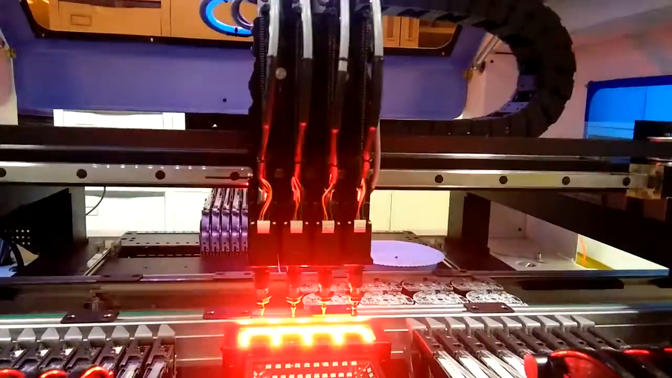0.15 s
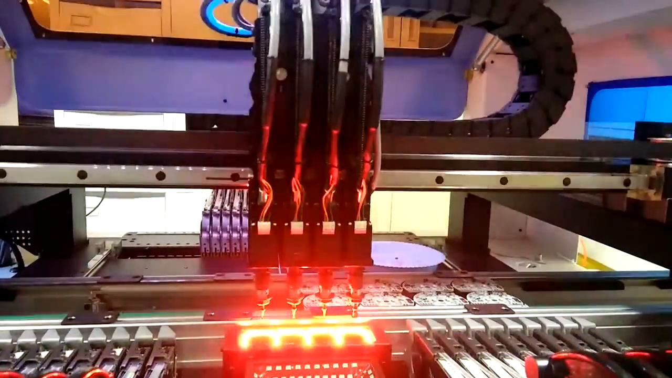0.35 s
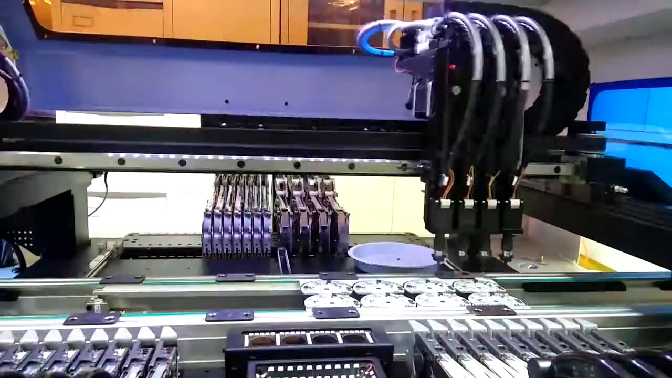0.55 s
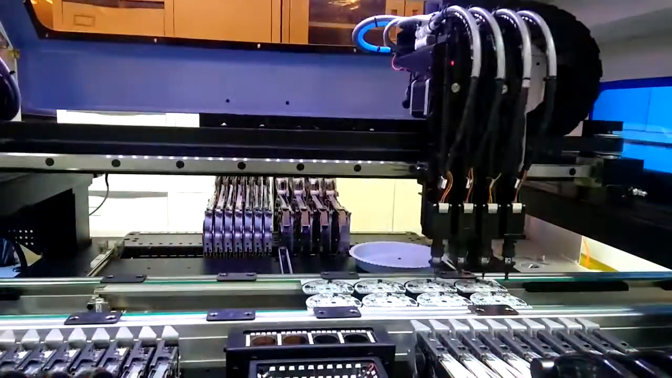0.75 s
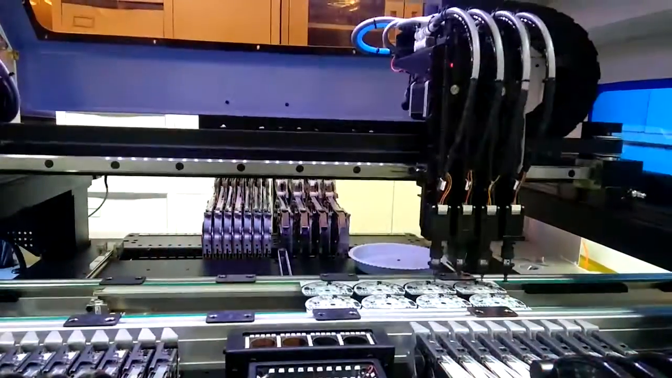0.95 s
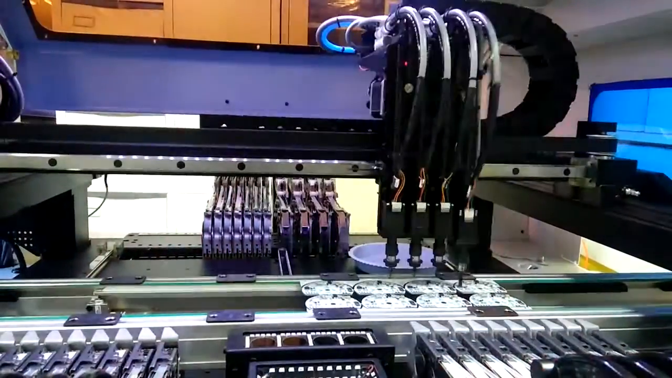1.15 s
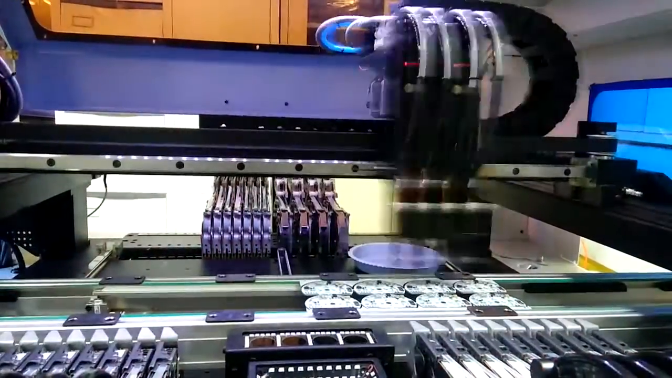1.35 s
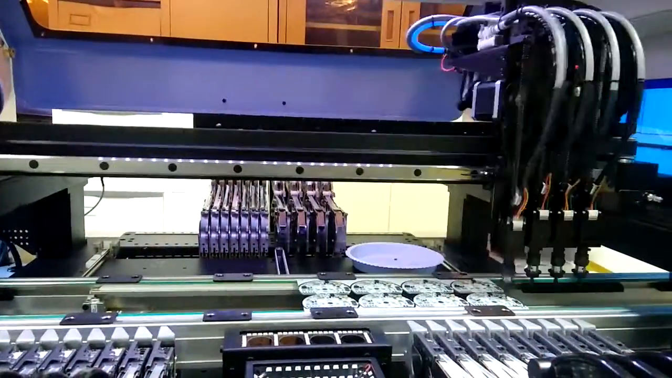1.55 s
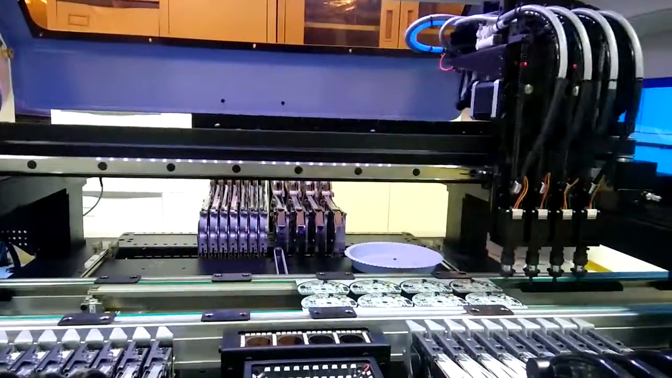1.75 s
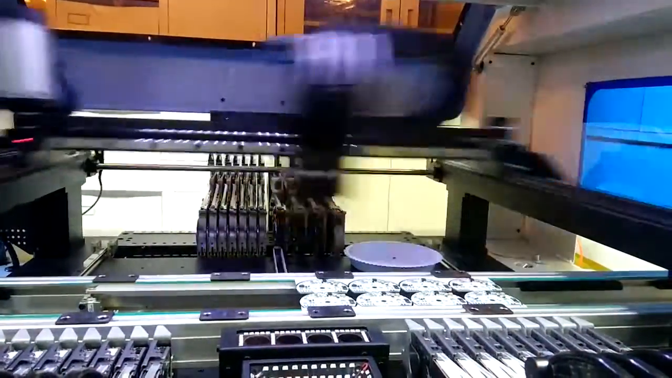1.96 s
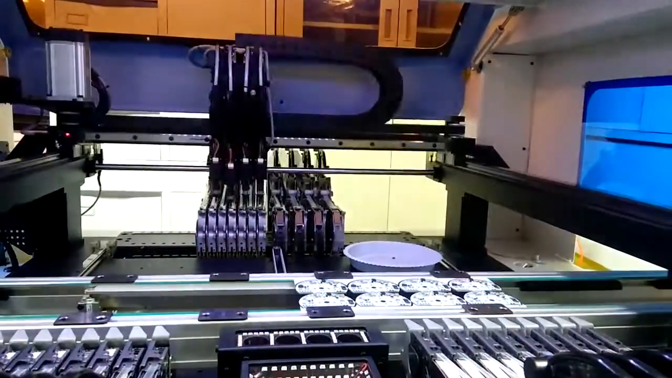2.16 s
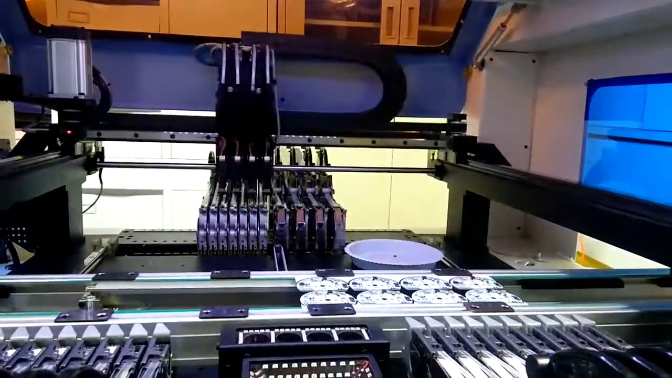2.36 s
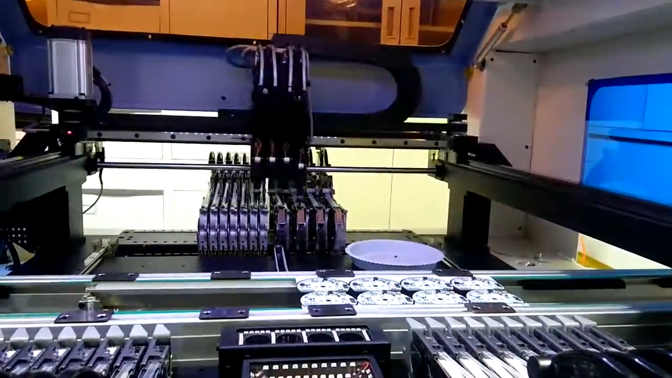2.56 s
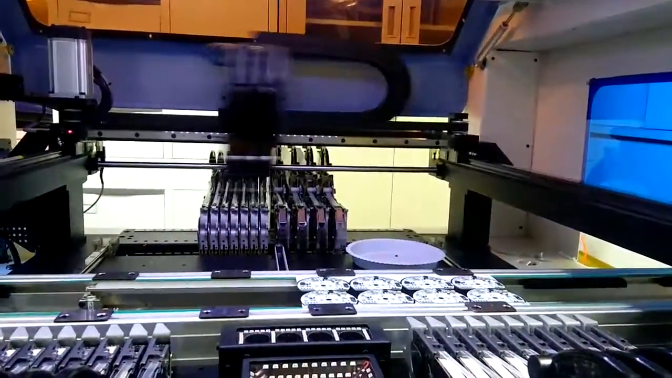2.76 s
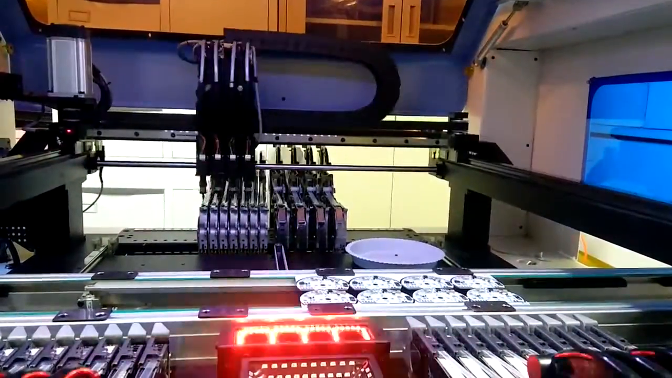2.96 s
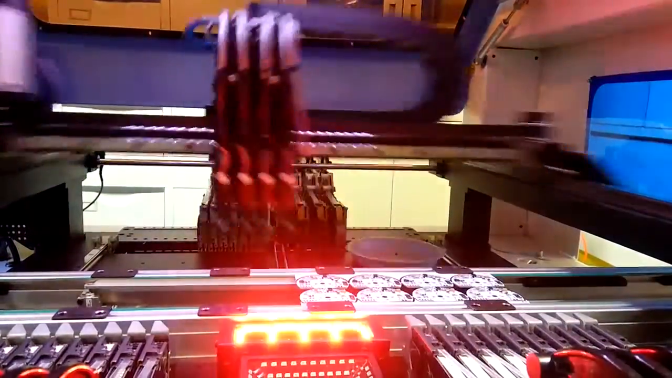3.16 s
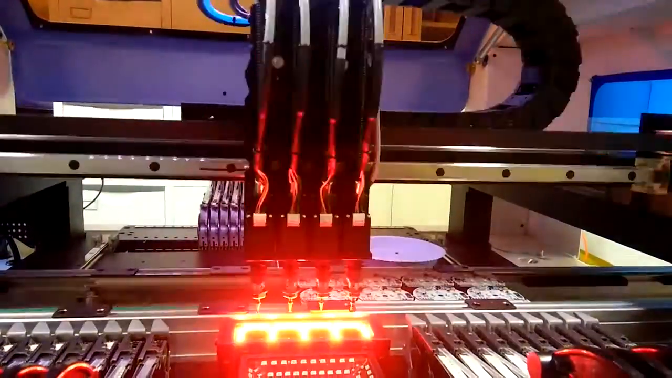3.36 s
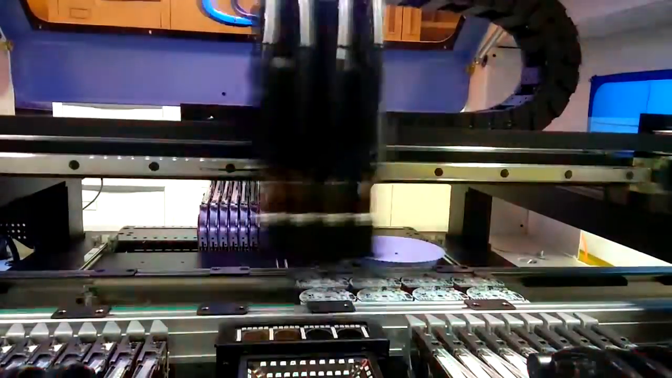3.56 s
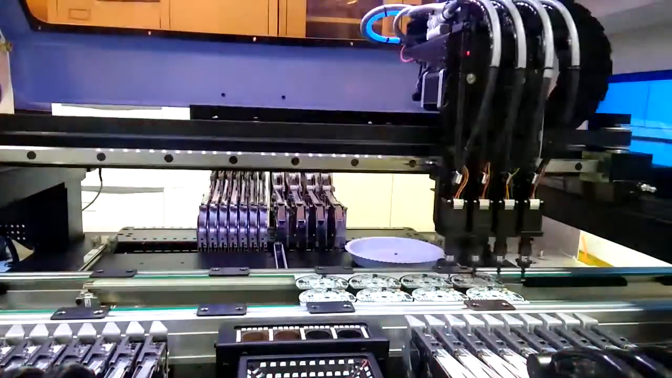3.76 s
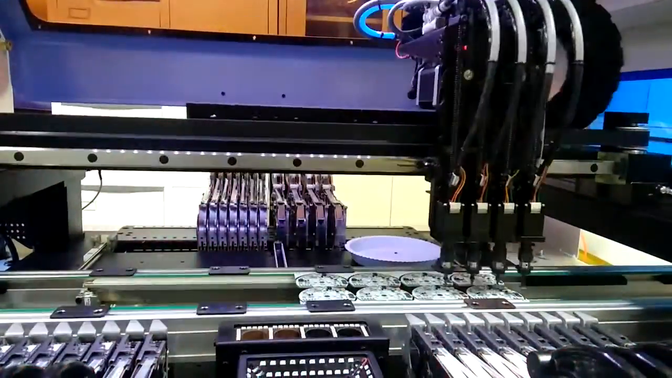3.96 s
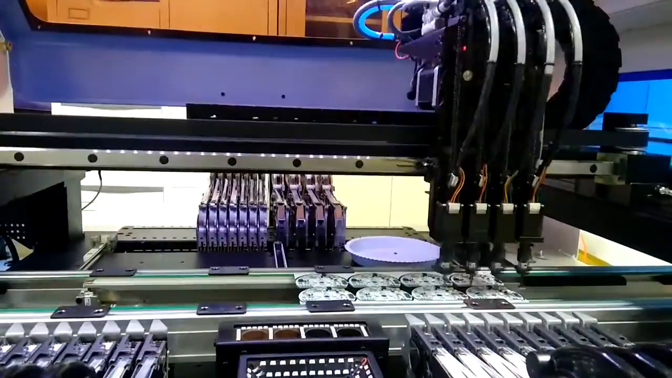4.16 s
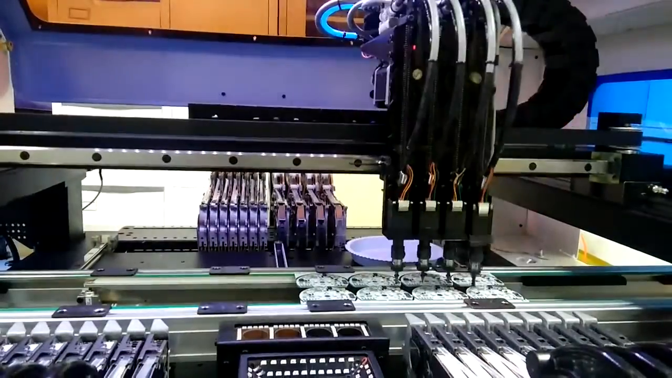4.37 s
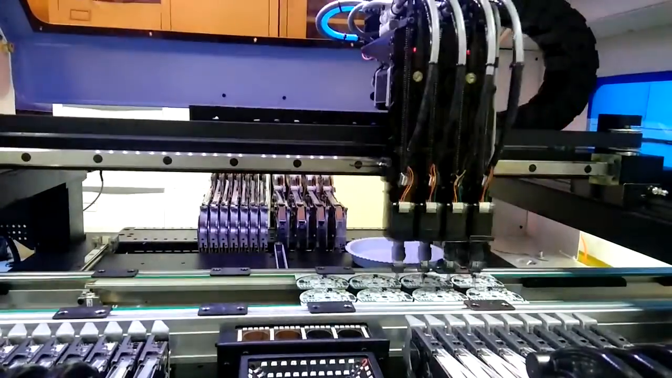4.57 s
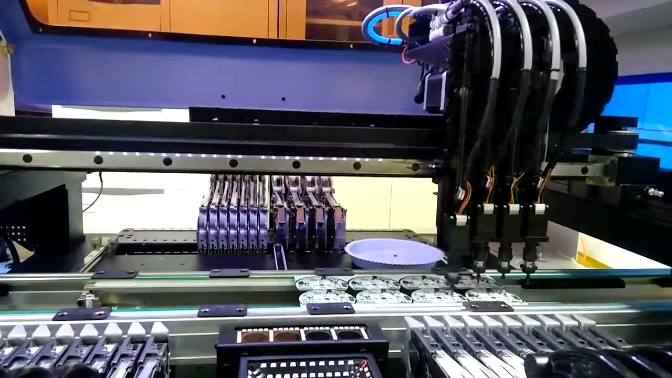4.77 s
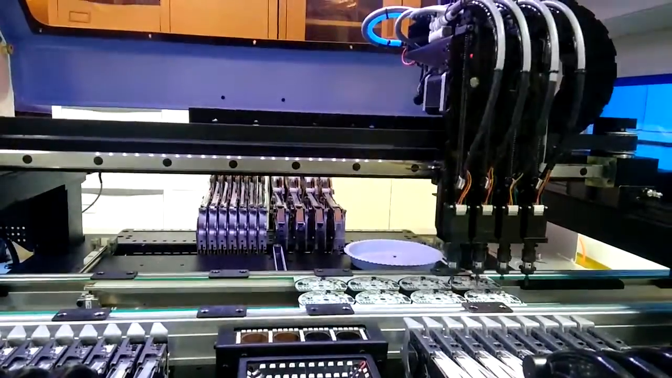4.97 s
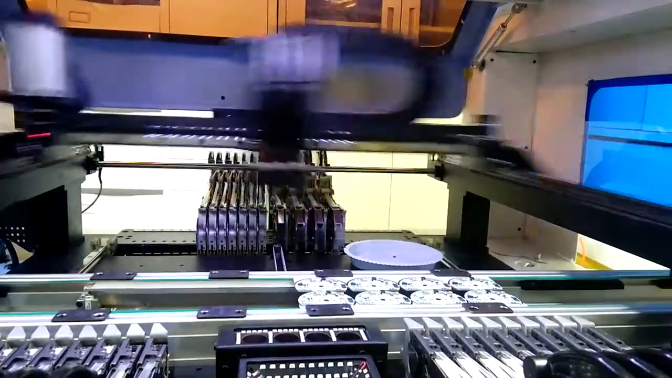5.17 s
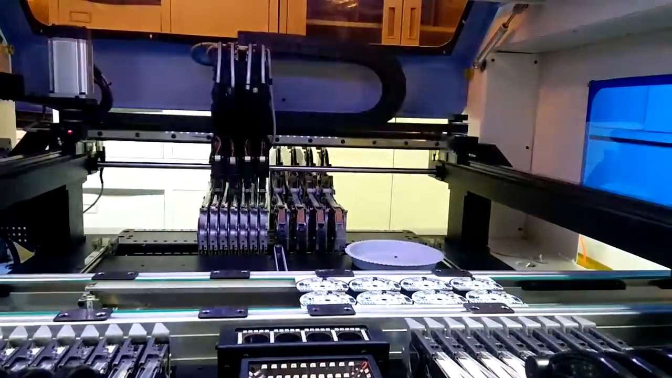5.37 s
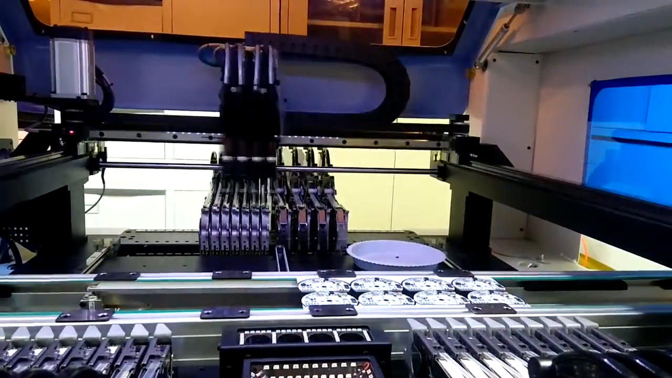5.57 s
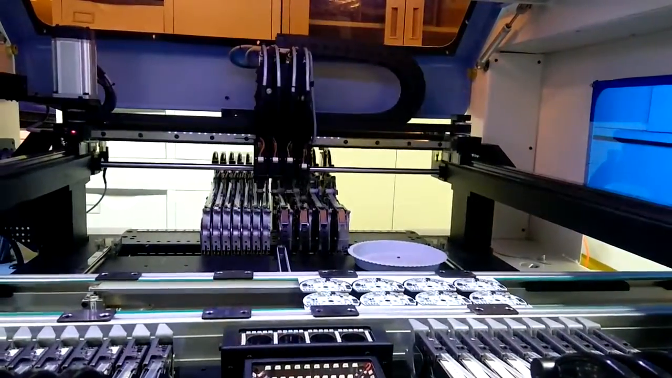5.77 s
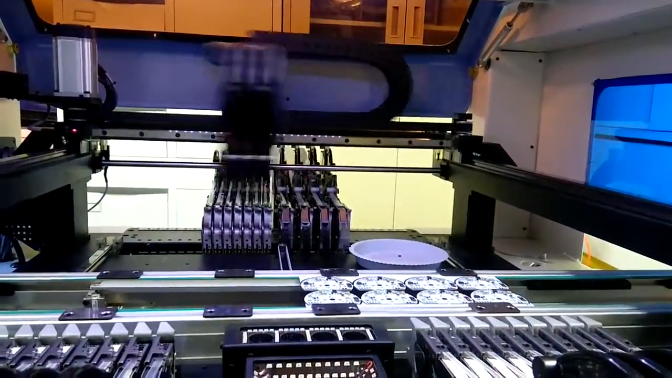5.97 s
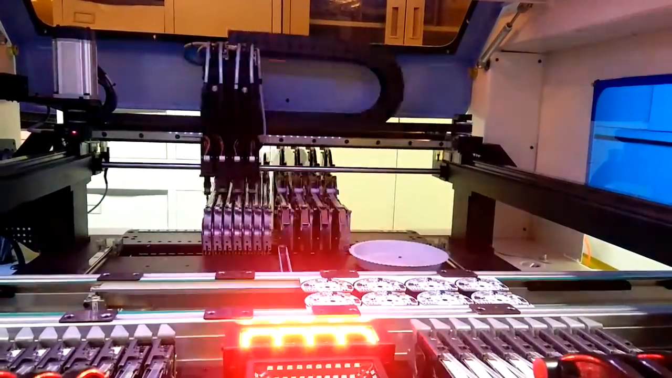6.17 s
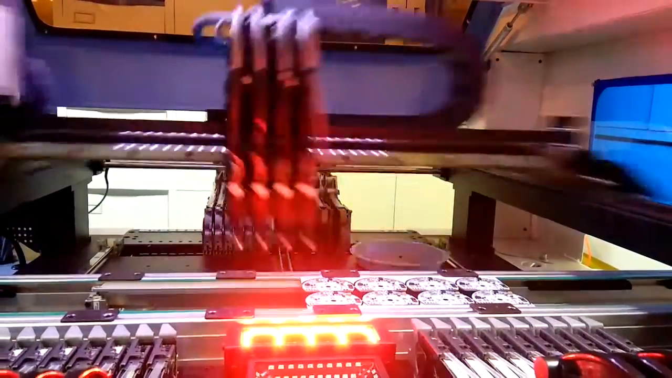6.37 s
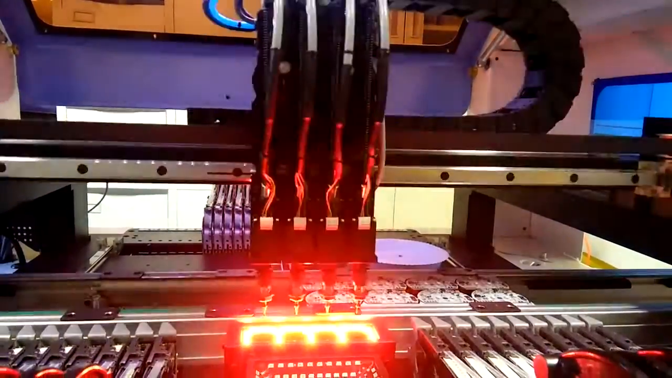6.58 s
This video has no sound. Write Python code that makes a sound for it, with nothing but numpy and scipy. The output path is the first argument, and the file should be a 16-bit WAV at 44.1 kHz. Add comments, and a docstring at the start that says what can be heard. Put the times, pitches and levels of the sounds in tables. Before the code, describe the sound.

Close inside a machine cabinet, a gantry rushes out with a gritty rolling roar and a buzzy belt whine, thumping as it brakes. Short servo hops and four spitting air puffs follow while vacuum hiss thins out. It rushes back, feeders clack and hiss builds up again, then the whole cycle repeats and a third outward run begins. Low workshop hum lies beneath.

```python
"""The roar of rails, the whine of a belt and the hiss of air come first: a gantry dashes out to its board.
A pick-and-place machine, close by in its cabinet, works through two cycles and sets out on a third run.
Rails and bearings are noise filtered by modes and following speed; belt, frame and servo are driven tones.
Vacuum nozzles hiss as turbulent noise while they hold parts, and let each go with a puff of air.
Feeders clack as scatters of reflections with a ringing part, and landing nozzles boom in the base."""
import sys
import numpy as np
from scipy import signal
from scipy.fft import rfft, irfft, next_fast_len
from scipy.io import wavfile

SR = 44100
rng = np.random.default_rng(int(sys.argv[2]) if len(sys.argv) > 2 else 0)


def to_wav(s):
    """Save 16-bit WAV."""
    ch = np.atleast_2d(s).T  # columns
    pcm = np.round(np.clip(ch, -1, 1) * 32767)  # PCM
    wavfile.write(sys.argv[1], SR, pcm.astype(np.int16))


N = 291501
SIZE = next_fast_len(N, True)
TIME, BINS = np.arange(N) / SR, np.fft.rfftfreq(SIZE, 1 / SR)


def amp(db):
    """Level law: decibels to amplitude gain."""
    return 10 ** (np.asarray(db) / 20)


def unit(x):
    """Normalisation: scales to an rms of 1."""
    return x / np.sqrt(np.mean(x ** 2) + 1e-20)


def colour(points):
    """Spectral envelope: joins (Hz, dB) points on a log axis into a gain for each bin."""
    hz, db = np.transpose(points)
    return amp(np.interp(np.log(BINS + 1), np.log(hz), db))


def peak(hz, width_hz):
    """Simple resonance: gain 1 at its centre, half power at the edges of its width."""
    return 1 / (1 + 2j * (BINS - hz) / width_hz)


def lifted(modes):
    """Modal superposition: a body's modes stand out of a flat background."""
    return 1 + sum((amp(db) - 1) * peak(hz, width) for hz, width, db in modes)


def shaped(x, response):
    """Linear filtering by a frequency response, then an rms of 1."""
    return unit(irfft(rfft(x, SIZE) * response, SIZE)[..., :N])


def noise():
    """Broadband excitation: white noise, as mid and side."""
    return rng.standard_normal((2, N))


def wander(rate_hz):
    """Slow random modulation: low-passed noise of rms 1."""
    return shaped(rng.standard_normal(N), np.exp(-(BINS / rate_hz) ** 2))


def add(mix, s, sound):
    """Superposition: mixes a sound in at time s, or at 0 if s is earlier."""
    part = mix[..., max(round(s * SR), 0):][..., :sound.shape[-1]]
    part += sound[..., :part.shape[-1]]


def rattle(per_s, share):
    """Contact noise: small impacts of uneven size hold this share of the power, rubbing the rest."""
    impacts = unit(noise() * (rng.random(N) < per_s / SR))
    return np.sqrt(share) * impacts + np.sqrt(1 - share) * noise()


def arch(s, length):
    """Raised-cosine envelope: a smooth rise and fall around the time s."""
    out = np.zeros(N)
    t = np.arange(max(s - length / 2, 0), s + length / 2, 1 / SR)
    add(out, s - length / 2, np.cos(np.pi * (t - s) / length) ** 2)
    return out


def ringing(blows, rise, t60):
    """Energy addition of decays: level of a body struck by (s, dB) blows, each followed for 1 s."""
    power, t = np.zeros(N), TIME[:SR]
    shape = (np.minimum(t / rise, 1) * amp(-60 * np.maximum(t - rise, 0) / t60)) ** 2
    for s, db in blows:
        add(power, s, amp(db) ** 2 * shape)
    return np.sqrt(power)


def lingering(gain, db, t60):
    """Reverberant storage: exponentially leaking power sets the level of a sound's tail."""
    keep = amp(-60 / (t60 * SR)) ** 2
    return amp(db) * np.sqrt(signal.lfilter([1 - keep], [1, -keep], gain ** 2))


def swell(s, hz, length, db, glide=0, grit_hz=55):
    """Narrow-band resonance, roughly driven, swelling around the time s: returns its start and sound."""
    t = np.arange(-length / 2, length / 2, 1 / SR)
    grit = signal.lfilter(*signal.butter(1, grit_hz, fs=SR), rng.standard_normal((2, SR // 2)))
    real, imaginary = unit(signal.lfilter(*signal.butter(2, 3 * grit_hz, fs=SR), grit))[:, -len(t):]
    rough = 1 + .34 * (real + 1j * imaginary)
    cycles = hz * t + glide * t ** 2 / 2 + rng.random()
    tone = unit((rough * np.exp(2j * np.pi * cycles)).real)
    return s - length / 2, amp(db) * tone * np.cos(np.pi * t / length) ** 2


# centre of the suction's broad resonance, which drifts over time: (time [s], centre [Hz])
SUCTION_PEAK = [(0, 5250), (.45, 4770), (.7, 4900), (1.0, 4920), (1.3, 5940), (1.65, 4540), (2.35, 4600),
                (2.5, 5500), (2.8, 5400), (3.15, 5360), (3.65, 4660), (4.15, 5670), (4.55, 4380),
                (5.5, 4860), (5.8, 5520), (6.1, 5430), (6.35, 5110)]


def patchy(x, depth_db, patch_hz, patch_s, peak_db=0, peak_hz=600):
    """Drifting patches: random regions of time and frequency lift and sink; peak_db lifts the suction's peak."""
    hz, t, z = signal.stft(x, SR, nperseg=1024, noverlap=768)
    across = np.fft.fftfreq(len(hz), hz[1])[:, None] * patch_hz
    along = np.fft.rfftfreq(len(t), t[1]) * patch_s
    blur = np.exp(-across ** 2 - along ** 2)
    chance = rng.standard_normal(z.shape[1:])
    patches = unit(np.fft.irfft2(np.fft.rfft2(chance) * blur, z.shape[1:]))
    centre = np.interp(t, *np.transpose(SUCTION_PEAK))
    hump = np.exp(-((hz[:, None] - centre) / peak_hz) ** 2)
    z = z * amp(depth_db * patches + peak_db * hump)
    return unit(signal.istft(z, SR, nperseg=1024, noverlap=768)[1][:, :N])


# long runs out to the board and back to the feeders; levels before the trims in the sources:
# (start [s], rolling [dB], sizzle of the bearings [dB], jolt of starting [dB], jolt of braking [dB])
OUT_RUNS = [(0.0, -29, -30.5, -29, -30.5), (3.183, -27.5, -32.5, -31.5, -29),
            (6.346, -28.5, -29, -29.5, -29)]
BACK_RUNS = [(1.991, -27.5, -46, -30.5, -33), (5.141, -27, -36.5, -31.5, -31)]
# course of a long run:
# (time to the fastest moment [s], length of rolling [s], length of sizzle [s], time to the brake's bite [s])
OUT_COURSE = (.18, 0.38, 0.43, .235)
BACK_COURSE = (0.15, 0.31, .28, 0.22)


def long_runs():
    """Repeated kinematics: every long run joined to the course of its direction."""
    return [(*run, *OUT_COURSE) for run in OUT_RUNS] + [(*run, *BACK_COURSE) for run in BACK_RUNS]


# noise spectrum of rolling: (frequency [Hz], relative density [dB])
ROLL_COLOUR = [(30, -37), (150, -15), (280, 6), (420, 5), (560, 2), (680, 2), (950, 0.5), (1500, -1),
               (2000, -3), (2900, -4), (3600, -10), (6000, -9), (8000, -16.5), (14000, -20)]
# modes of the gantry: (frequency [Hz], width [Hz], lift [dB])
GANTRY_MODES = [(388, 40, -4), (464, 71, 11), (743, 32, 5), (920, 17, 3.5), (976, 10, 5), (1236, 19, 4.5),
                (1340, 13, 9), (1664, 29, 2), (2244, 28, 7.5), (2760, 130, 5.5)]
# the head creeps into a run and out of it (dB below full speed's level, added length)
CREEP_DB, CREEP_S = -27.5, 0.028
HOP_ROLL_DB = -3  # rolling under a hop, relative to its rattle
CLACK_ROLL_DB, CLACK_ROLL_T60 = -17.5, 0.35  # gantry's rattle relative to a clack, decay in s
# the cabinet holds on to the rolling, less so to its treble (level, decay in s, corner)
LINGER_DB, LINGER_T60, LINGER_HZ = -11, 0.67, 2170


def rolling():
    """Rolling noise: bearings and cable chain excite the gantry's modes as speed rises; the cabinet lingers."""
    body = colour(ROLL_COLOUR) * lifted(GANTRY_MODES)
    roll = shaped(rattle(per_s=1100, share=0.32) * amp(0.29 * wander(60)), body)
    roll = patchy(roll, 3.9, patch_hz=110, patch_s=.07)
    echo = shaped(noise(), body / (1 + (BINS / LINGER_HZ) ** 4))
    level = np.zeros(N)
    for start, roll_db, _, _, _, fastest, length, *_ in long_runs():
        s = start + fastest
        level += amp(roll_db) * (arch(s, length) + amp(CREEP_DB) * arch(s, length + CREEP_S))
    level += sum(amp(db + HOP_ROLL_DB) * arch(s, length) for s, length, db, *_ in HOPS)
    echo_level = lingering(level, LINGER_DB, LINGER_T60)
    # every clack also rattles the gantry
    blows = [(s, db + CLACK_ROLL_DB) for s, db, *_ in all_clacks()]
    knocked = ringing(blows, rise=0.0033, t60=CLACK_ROLL_T60)
    mid_side_trim = amp([[3.8], [-4]])
    return mid_side_trim * (roll * np.hypot(level, knocked) + echo * echo_level)


# noise spectrum of the bearings' sizzle: (frequency [Hz], relative density [dB])
SIZZLE_COLOUR = [(2500, -26.5), (4500, -9.5), (6000, -3.5), (7500, -9), (9000, 3.5), (10000, 2.5),
                 (11200, -0.5), (14300, -5.5)]
SIZZLE_POWER = 1.64  # how steeply sizzle grows: power of the speed's arch


def sizzling():
    """Micro-impact noise: bearings sizzle in the treble, growing steeply with the head's speed."""
    sizzle = shaped(rattle(per_s=1500, share=0.24) * amp(1.5 * wander(90)), colour(SIZZLE_COLOUR))
    sizzle = patchy(sizzle, 3.1, patch_hz=180, patch_s=.05)
    level = np.zeros(N)
    for start, _, sizzle_db, _, _, fastest, _, length, _ in long_runs():
        level += amp(sizzle_db) * arch(start + fastest, length) ** SIZZLE_POWER
    return amp(1.5) * sizzle * level


# noise spectra of the shaken frame and of the heavy base: (frequency [Hz], relative density [dB])
SHAKE_COLOUR = [(25, -44.5), (60, -35), (105, -9.5), (135, 2.5), (190, -3), (250, 2), (330, -6), (480, -12),
                (800, -31)]
RUMBLE_COLOUR = [(20, -25), (35, -27.5), (48, -15.5), (58, -3), (75, 7.5), (102, -3), (132, 10.5),
                 (175, 3.5), (260, -24)]
JOLT_RISE_S, JOLT_T60 = 0.031, 0.76  # the frame's answer to any jolt (rise, decay in s)
# a hop jolts as it starts and brakes (shares of its length from the fastest moment)
HOP_START, HOP_BRAKE = -.28, 0.17
HOP_START_DB = -4  # a hop's starting jolt, relative to the braking one


def shaking(rumble_follows=0.66):
    """Inertial excitation: the gantry's starts and stops and landing nozzles shake the frame and base."""
    jolts = landings()
    for start, _, _, start_db, brake_db, *_, brake in long_runs():
        jolts += [(start + 0.012, start_db), (start + brake, brake_db)]
    for s, length, _, db, *_ in HOPS:
        jolts += [(s + HOP_START * length, db + HOP_START_DB), (s + HOP_BRAKE * length, db)]
    level = ringing(jolts, JOLT_RISE_S, JOLT_T60)
    shake = shaped(noise(), colour(SHAKE_COLOUR)) * level
    # the heavy base answers less sharply than the frame
    rumble = shaped(noise(), colour(RUMBLE_COLOUR)) * level ** rumble_follows
    return amp(-4.5) * shake + amp(-24.5) * rumble


# belt speed in a long run: (time into the run [s], mean tooth rate [Hz])
OUT_SPEED = [(0, 123), (.05, 330), (.11, 424.8), (.135, 450), (.185, 440), (.21, 430), (.23, 374),
             (.3, 211), (.36, 60)]
BACK_SPEED = [(0, 98), (.06, 327.7), (.11, 422), (.15, 441.4), (.17, 446), (.21, 412), (.25, 335),
              (.32, 60.7)]


def belt(speed, second_db, third_db, fourth_db):
    """Tooth meshing: belt teeth on the pulley whine in unsteady harmonics that grow steeply with speed."""
    s, hz = np.transpose(speed)
    rate = np.interp(TIME[TIME < s[-1]], s, hz)
    slack, load = wander(120)[:2 * len(rate)].reshape(2, -1)
    meshes = np.cumsum(rate * (1 + .021 * slack)) / SR
    levels = enumerate((second_db, third_db, fourth_db), 2)
    tones = sum(amp(db) * np.sin(2 * np.pi * k * meshes) for k, db in levels)
    return tones * (rate / hz.max()) ** 9 * amp(4 * load)


def belt_runs():
    """Repeated speed ramp: the same belt whine, central, in every long run of a direction."""
    out = np.zeros((2, N))
    for start, *_ in OUT_RUNS:
        add(out[0], start, belt(OUT_SPEED, second_db=-35.5, third_db=-38.5, fourth_db=-35.5))
    for start, *_ in BACK_RUNS:
        add(out[0], start, belt(BACK_SPEED, second_db=-28.5, third_db=-49.5, fourth_db=-45.5))
    return out


# each nozzle hisses from picking a part to placing it; jet level as heard at the board:
# (open [s], shut [s], suction [dB], thin jet at the tip [dB])
HOLDS = [(-.1, .801, -44, -62), (-.1, 1.003, -42, -58), (-.1, 1.365, -43, -47), (-.1, 1.756, -52, -50),
         (2.304, 4.911, -51, -53), (2.42, 4.577, -43.5, -46), (2.558, 4.217, -46.5, -56),
         (2.883, 4.011, -44.5, -58), (5.452, 7, -52, -47), (5.575, 7, -43, -54), (5.732, 7, -46, -53),
         (6.064, 7, -40, -65)]
# the air's start and stop (rise, time that it runs on after the valve shuts, decay in s)
AIR_RISE_S, AIR_RUN_ON_S, AIR_T60 = 0.01, 0.013, .24
# an opening nozzle gulps air until its part is seated (suction, jet, decay in s)
GULP_DB, GULP_JET_DB, GULP_T60 = -47, -49, 1.5
JET_FAR_DB = -3.5  # change of the jet with the head far back at the feeders
EMPTY_DELAY_S, EMPTY_S = 0.064, 0.21  # hiss of an emptied nozzle (puff to its height, length)


def airflow():
    """Energy addition: open nozzles sum in power; the jet alone weakens as the head moves away."""
    power, far = np.zeros((2, N)), np.ones(N)
    for opens, shuts, suction_db, jet_db in HOLDS:
        age = np.maximum(TIME - opens, 0)
        fall = amp(-60 * np.clip((TIME - shuts - AIR_RUN_ON_S) / AIR_T60, 0, 2))
        flow = np.minimum(age / AIR_RISE_S, 1) * fall
        gulp = amp([[GULP_DB], [GULP_JET_DB]]) * amp(-60 * age / GULP_T60)
        power += (np.hypot(amp([[suction_db], [jet_db]]), gulp) * flow) ** 2
    # far is 1 at the feeders and 0 at the board
    for runs, (_, length, *_), way in ((OUT_RUNS, OUT_COURSE, -1), (BACK_RUNS, BACK_COURSE, 1)):
        far += way * sum(np.clip((TIME - start) / length, 0, 1) for start, *_ in runs)
    suction, jet = np.sqrt(power)
    emptied = sum(amp(db) * arch(s + EMPTY_DELAY_S, EMPTY_S) for s, *_, db in PUFFS)
    return suction, np.hypot(jet * amp(far * JET_FAR_DB), emptied)


# noise spectra of the suction and of the jets: (frequency [Hz], relative density [dB])
VACUUM_COLOUR = [(500, -6.5), (1800, -20.5), (2700, -4.5), (3500, -0.5), (4500, 4), (5200, 0), (6000, 4.5),
                 (7500, -6), (8600, -8.5), (9700, -3), (11000, -12.5), (14300, -17.5)]
JET_COLOUR = [(2500, -24.5), (5000, -48), (6300, 4.5), (7700, -3.5), (9700, 6.5), (11500, 0), (14300, -5.5)]


def air(resonance_db=4):
    """Turbulence noise: suction and the jets at the tips hiss with a flutter."""
    suction = shaped(rattle(per_s=2500, share=0.17), colour(VACUUM_COLOUR))
    suction = patchy(suction, 3.1, patch_hz=120, patch_s=.06, peak_db=resonance_db)
    jet = patchy(shaped(noise(), colour(JET_COLOUR)), 2.6, patch_hz=150, patch_s=.12)
    suction_level, jet_level = airflow()
    suction = suction * suction_level * amp(1.1 * wander(50))
    return suction + jet * jet_level * amp(.5 * wander(70))


# clacks of the feeders as parts are picked; thud before the trims in the sources:
# (time [s], level [dB], ring [Hz], share of ring [0-1], t60 [s], thud [dB])
CLACKS = [(2.343, -35.5, 2600, 0.6, 0.073, -56), (2.421, -31, 5400, 1, 0.066, -44),
          (2.484, -39, 5200, 0.3, 0.092, -65), (2.558, -33, 6230, 1, 0.21, -39.5),
          (2.688, -44, 2600, 0, 0.27, -62), (2.884, -34, 5250, 0.82, 0.21, -49),
          (2.975, -37, 3970, .3, 0.081, -62), (3.048, -43, 2260, .5, 0.43, -51),
          (5.491, -36.5, 2610, 0.1, 0.094, -48), (5.73, -32.5, 6500, 0.98, 0.15, -38.5),
          (5.855, -44.5, 2560, 0, 0.51, -65), (6.062, -40, 2320, 0.08, 0.22, -56),
          (6.165, -35, 3760, 0.93, 0.12, -63)]
# a knock and a ping set off the runs to the board:
# (time into the run [s], level [dB], ring [Hz], share of ring [0-1], t60 [s])
OUT_CLACKS = [(-.021, -35.5, 653, 0.53, 0.1), (.007, -35, 2200, 0.97, .075)]
VALVE_RING_HZ, VALVE_RING_SHARE, VALVE_T60 = 2600, 0.77, 0.068  # the valve's clack (decay in s)


def all_clacks():
    """Impact list of feeders, valves and departures, as (s, dB, ring Hz, share of ring, t60 s)."""
    rows = [row[:-1] for row in CLACKS]
    for s, *_, clack_db, thud_db, empty_db in PUFFS:
        rows.append((s, clack_db, VALVE_RING_HZ, VALVE_RING_SHARE, VALVE_T60))
    for start, *_ in OUT_RUNS:
        rows += [(start + s, *rest) for s, *rest in OUT_CLACKS if start + s >= 0]
    return rows


def clacks(low_hz=700, high_hz=6500, ring_share_of_hz=0.056, rise=0.0058):
    """Impact response: a decaying scatter of reflections with one ringing part, followed for 1/4 s."""
    out, t = np.zeros((2, N)), TIME[:SR // 4]
    band = signal.butter(2, [low_hz, high_hz], "bandpass", fs=SR)
    for s, db, hz, share, t60 in all_clacks():
        scatter = rng.standard_normal((2, len(t)))
        ring = unit(signal.lfilter(*signal.iirpeak(hz, 1 / ring_share_of_hz, SR), scatter))
        broad = unit(signal.lfilter(*band, scatter))
        knock = np.sqrt(share) * ring + np.sqrt(1 - share) * broad
        add(out, s, knock * amp(db - 60 * t / t60) * np.minimum(t / rise, 1))
    return out


# frame resonances that swell as the belt's tones sweep by:
# (time into the run [s], frequency [Hz], length [s], level [dB])
OUT_SWELLS = [(0.063, 408, 0.064, -26.5), (.117, 830, 0.056, -25.5), (.12, 440, .052, -21),
              (0.157, 447, 0.084, -20), (0.202, 442, 0.058, -18), (.25, 459, .05, -18),
              (0.273, 440.5, 0.069, -18.5), (0.318, 466, 0.14, -28), (0.208, 933, 0.061, -29.5),
              (0.271, 896, 0.12, -34), (.4, 464, 0.22, -45)]
BACK_SWELLS = [(0.068, 404, 0.066, -27), (.105, 388, 0.0515, -35), (.146, 433, 0.039, -23.5),
               (0.159, 885, 0.061, -25), (.192, 463, 0.046, -24), (.208, 816, 0.029, -22.5),
               (.228, 432, .042, -18.5), (0.26, 440, 0.052, -20.5), (.265, 819, 0.13, -32.5),
               (0.304, 448, 0.0574, -31.5)]


def frame():
    """Passage through resonance: each run repeats its speed ramp, so the frame sings at the same places."""
    out = np.zeros((2, N))
    for runs, swells in ((OUT_RUNS, OUT_SWELLS), (BACK_RUNS, BACK_SWELLS)):
        for start, *_ in runs:
            for s, hz, length, db in swells:
                add(out[0], *swell(start + s, hz, length, db))
    return out


# short hops of the head; jolt before the trims in shaking:
# (time at the fastest [s], length [s], rattle [dB], jolt [dB],
#  servo's top note [Hz], its level [dB], servo's low notes [Hz], their level [dB])
HOPS = [(0.643, 0.18, -36, -26.5, 316, -27.5, 173, -29.5), (1.2, .089, -58, -47, 250, -53, 132, -45.5),
        (1.46, .14, -62, -62, 280, -72, 135, -50.5), (1.605, 0.12, -42.5, -39, 407, -40, 250, -37),
        (2.35, 0.15, -51, -45, 332, -55, 170, -52), (2.614, 0.15, -55, -53, 262, -47, 170, -46),
        (2.743, .08, -56, -51, 310, -55, 150, -60), (2.96, 0.12, -48.5, -50.5, 404, -63, 203, -51.5),
        (3.11, 0.15, -54.5, -53, 451.4, -53, 139.6, -51),
        (3.832, .17, -39.5, -31.5, 326, -28, 243.4, -34.5), (4.2, 0.097, -55.5, -48, 300, -54, 137, -48),
        (4.412, 0.065, -55, -50.5, 306, -49, 137, -49), (4.783, 0.13, -56.5, -52, 297, -62, 140, -69.5),
        (5.575, 0.36, -48.5, -45, 325, -46, 149, -50), (5.789, 0.051, -54, -58, 255, -52, 165, -56),
        (5.909, .1, -58.5, -63, 266, -64, 140, -52), (6.135, 0.099, -48.5, -50, 300, -53, 220, -47),
        (6.25, 0.16, -59.5, -46, 456, -55, 140, -53)]
# modes of the head, each response squared: (frequency [Hz], width before squaring [Hz], level [dB])
HOP_MODES = [(636, 9.4, 10), (1014, 38, 3.5), (1178, 99, -1), (1353, 143, 3), (1760, 120, -3),
             (2073, 84, -4), (2380, 460, -7)]
HOP_RING_DB, HOP_RING_T60 = -5.5, 0.36  # the modes ring on after a hop (level, decay in s)


def hops():
    """Modal excitation: a short hop rattles the head's modes, which ring on briefly."""
    ring = shaped(noise(), sum(amp(db) * peak(hz, width) ** 2 for hz, width, db in HOP_MODES))
    speed = sum(amp(db) * arch(s, length) for s, length, db, *_ in HOPS)
    return ring * np.hypot(speed, lingering(speed, HOP_RING_DB, HOP_RING_T60))


# the servo's notes (delay of the top note, its length, length of the low notes)
HUM_DELAY_S, TOP_NOTE_S, LOW_NOTE_S = 0.018, 0.0707, 0.0544


def servo():
    """Motor tones that follow speed: in a hop the servo hums low, high, low."""
    out = np.zeros((2, N))
    for s, length, _, _, hz, db, low_hz, low_db in HOPS:
        add(out[0], *swell(s + HUM_DELAY_S, hz, TOP_NOTE_S, db, grit_hz=40))
        for share in (HOP_START, HOP_BRAKE):
            low_s = s + share * length + JOLT_RISE_S
            add(out[0], *swell(low_s, low_hz, LOW_NOTE_S, low_db, grit_hz=30.55))
    return out


LANDING_S = 0.025  # how long a nozzle lands before its clack or puff


def landings():
    """Impact list: a nozzle lands just before each feeder's clack and each puff, as (s, thud dB)."""
    feeders = [(s - LANDING_S, db) for s, *_, db in CLACKS]
    return feeders + [(s - LANDING_S, db) for s, *_, db, empty_db in PUFFS]


# low modes that a landing nozzle sets booming: (frequency [Hz], length [s], level above its thud [dB])
LANDING_MODES = [(76.5, .1, -9), (132, 0.1105, -6)]


def booms():
    """Low-frequency modal response: nozzles landing on feeders and board set the base booming."""
    out = np.zeros((2, N))
    for s, thud_db in landings():
        for hz, length, db in LANDING_MODES:
            add(out[0], *swell(s + length / 4, hz, length, thud_db + db, grit_hz=18))
    return out


# placing a part with a puff; side before the width filter, thud before the trims in the sources:
# (time [s], level [dB], valve open [s], centre of the jet's hiss [Hz], strength of the nozzle's ring [ratio],
#  side minus mid [dB], valve's clack [dB], thud on the board [dB], hiss of the emptied nozzle [dB])
PUFFS = [(0.802, -27, .006, 12000, .2, -2, -40, -39, -39.5),
         (1.001, -24.5, 0.016, 11100, .2, -14, -43.5, -38, -40),
         (1.366, -24, 0.0089, 11700, 0.27, -18, -45, -53, -42),
         (1.756, -21, 0.014, 9100, 0.82, -11, -48, -58.5, -70),
         (4.011, -26, 0.0091, 11900, .2, -10, -36.5, -38.5, -36.5),
         (4.217, -26.5, 0.016, 11900, 0.2, -4, -52, -38.5, -36),
         (4.576, -39, 0.0077, 10050, .4, -9.5, -44.5, -66.5, -67),
         (4.911, -23, 0.011, 9650, .4, -11, -41, -61, -70)]
# noise spectrum of a puff: (frequency [Hz], relative density [dB])
PUFF_COLOUR = [(300, -10.5), (2000, -24), (4300, -19.5), (5100, -11), (6000, -9), (7200, -2.5),
               (8300, -5.5), (10300, 3), (11500, -4.5), (14300, -5)]
# modes of a nozzle: (frequency [Hz], width [Hz], lift at a ring strength of 1 [dB])
NOZZLE_MODES = [(5060, 41, 22.5), (7500, 300, -9), (8240, 260, 13.5), (10100, 130, 1), (10200, 150, 0.5)]


def puffs(rise=0.0049, shut_t60=0.084, cabinet_db=-10, cabinet_t60=0.21, jet_db=6, jet_hz=2600):
    """Jet noise: a sputtering burst rings the nozzle, then dies away in two slopes, the later the cabinet's."""
    out, t = np.zeros((2, N)), TIME[:SR // 3]
    burst = rfft(noise() * amp(0.92 * wander(400)), SIZE) * colour(PUFF_COLOUR)
    modes = lifted(NOZZLE_MODES) - 1
    for s, db, held, centre_hz, ring, side_db, *_ in PUFFS:
        hump = amp(jet_db * np.exp(-((BINS - centre_hz) / jet_hz) ** 2))
        jet = unit(irfft(burst * hump * (1 + ring * modes), SIZE))
        jet = jet[:, round(s * SR):][:, :len(t)]
        after = np.maximum(t - held, 0)
        fall = np.hypot(amp(-60 * after / shut_t60), amp(cabinet_db - 60 * after / cabinet_t60))
        add(out, s, amp([[db], [db + side_db]]) * jet * np.minimum(t / rise, 1) * fall)
    return out


# small motors at the feeders: (time at the loudest [s], frequency then [Hz], length [s], level [dB], glide [Hz/s])
WHINES = [(3.01, 466, 0.17, -42.5, -100), (5.555, 572, .15, -42, 1200), (6.193, 455, .17, -41, -100)]


def feeder_motors():
    """Gliding motor tones: small motors whine at the feeders."""
    out = np.zeros((2, N))
    for row in WHINES:
        add(out[0], *swell(*row, grit_hz=35))
    return out


# noise spectrum of the workshop's floor: (frequency [Hz], relative density [dB])
FLOOR_COLOUR = [(15, -37.5), (25, -34), (81, -1.5), (157, 10), (216, -18.5), (290, -3), (796, -16),
                (3440, -23.5), (5710, -47.5), (9730, -40.5), (14500, -41.5)]
# width at the microphone pair: (frequency [Hz], gain of the side signal [dB])
WIDTH = [(3300, -81), (3800, -45.5), (4400, -47), (6000, -16), (7400, -6.5), (9500, -5.5), (13000, -5.5)]


def scene():
    """Superposition over the workshop's low floor; the body is central, only the treble has width."""
    floor = amp(-64) * shaped(noise(), colour(FLOOR_COLOUR))
    motion = rolling() + sizzling() + shaking() + belt_runs() + frame() + hops() + servo()
    handling = air() + clacks() + booms() + puffs() + feeder_motors()
    mid, side = motion + handling + floor
    side = irfft(rfft(side, SIZE) * colour(WIDTH), SIZE)[:N]
    return np.array([mid + side, mid - side])


def record(dry):
    """Band limitation: a steep linear-phase low-pass at 14450 Hz."""
    low_pass = signal.firwin(511, 14450, window=("kaiser", 8), fs=SR)
    return signal.oaconvolve(dry, low_pass[None], "same")


dry = scene()
out = record(dry)
to_wav(out)
```